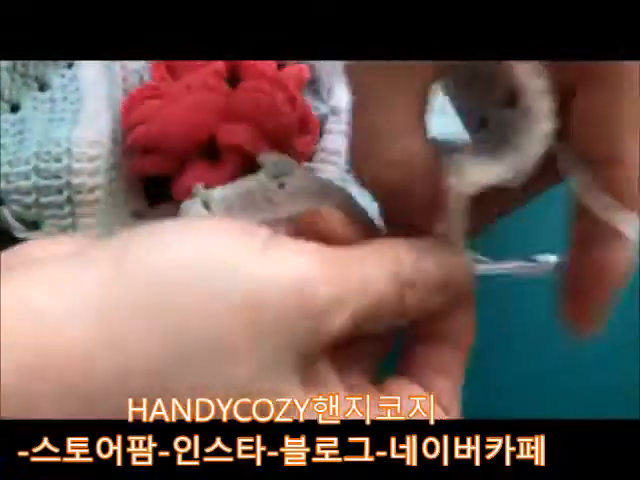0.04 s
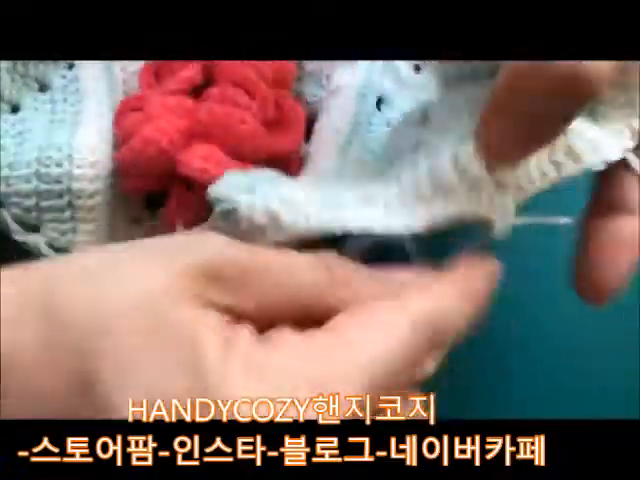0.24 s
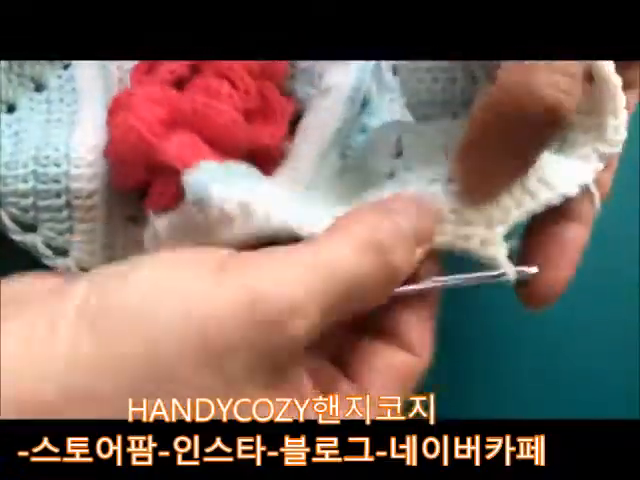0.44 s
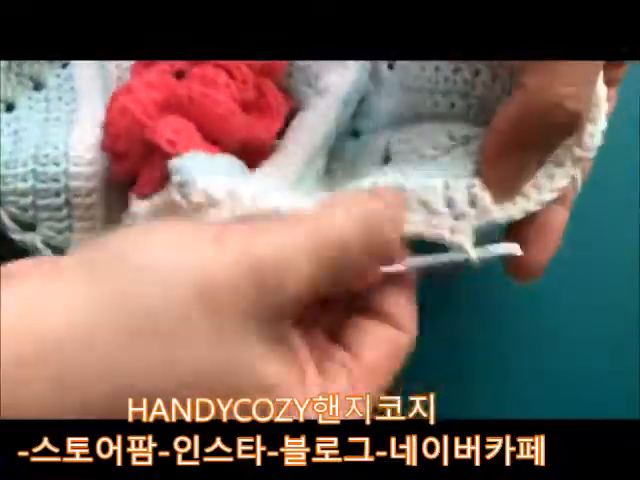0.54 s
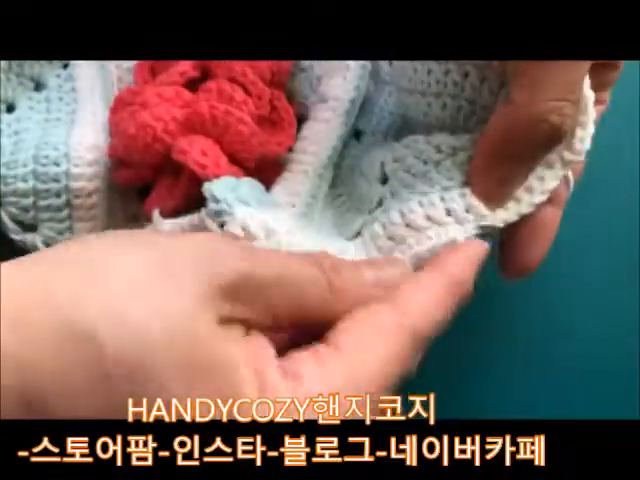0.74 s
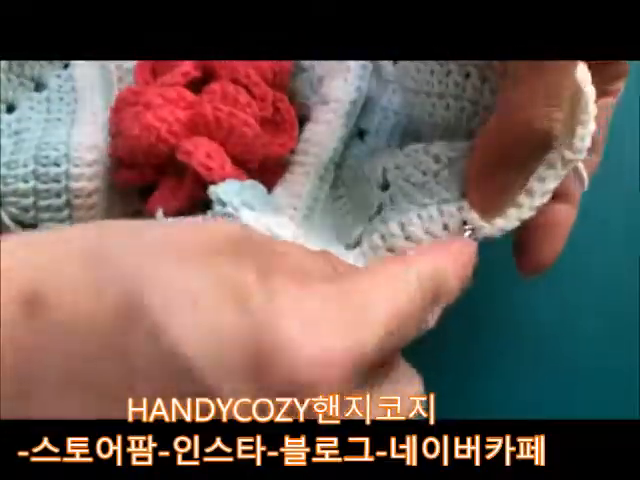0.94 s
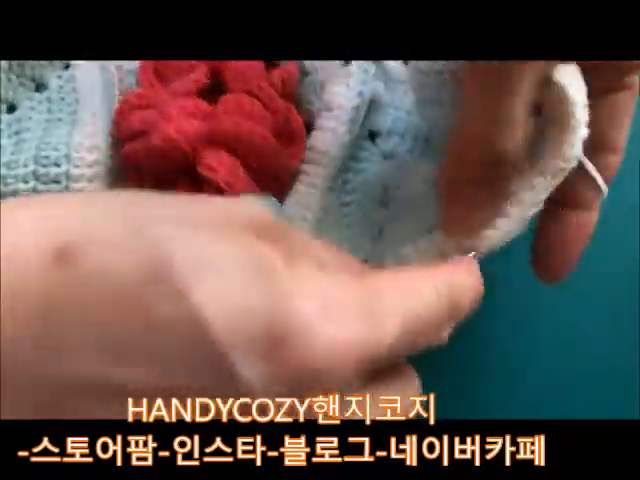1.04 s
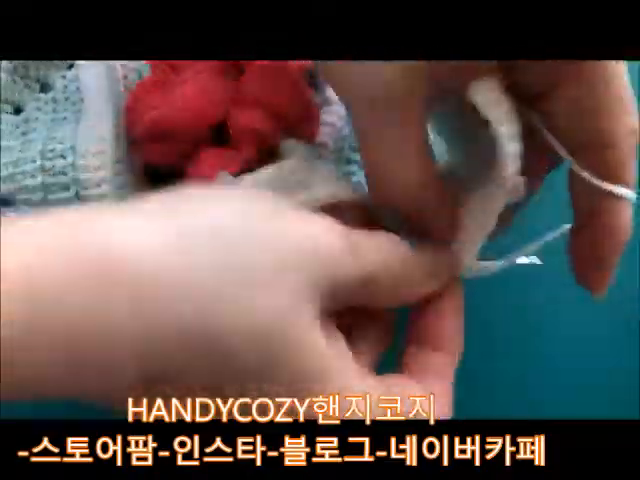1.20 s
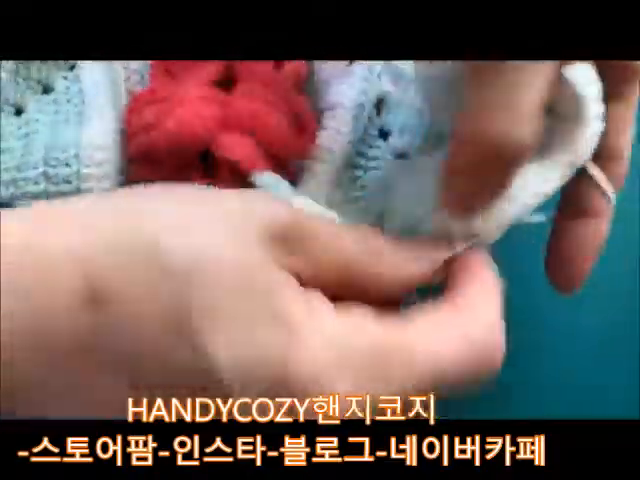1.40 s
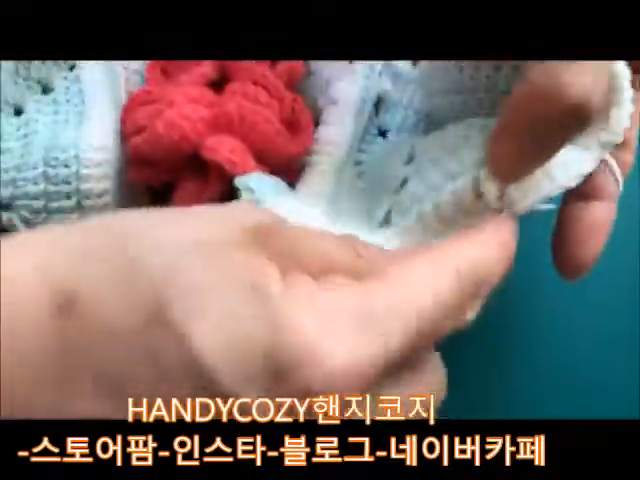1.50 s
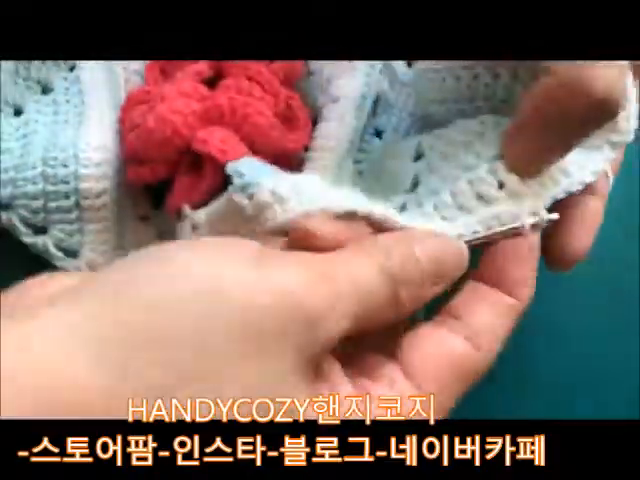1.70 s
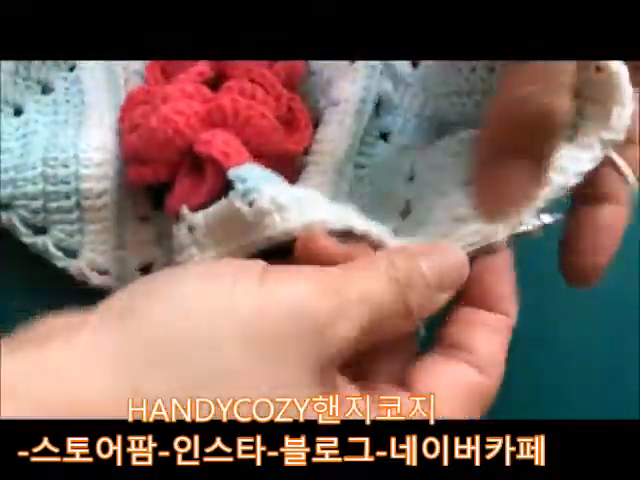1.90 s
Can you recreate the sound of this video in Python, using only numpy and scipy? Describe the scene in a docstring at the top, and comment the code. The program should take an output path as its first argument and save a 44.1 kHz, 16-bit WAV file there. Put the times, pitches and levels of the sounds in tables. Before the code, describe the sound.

Crocheted fabric rustles softly over fingers, with light hook ticks and dull table bumps.

```python
"""Yarn rustles over the fingers as hands turn a piece of crochet close to the microphone.
Countless fibres slip in each stroke, and the hook and snagging strands tick now and then.
The hands nudge the work table into its low, damped modes, once with a soft thump, and rumble
as they shift on it. The faint hum and hiss of a quiet room lie underneath."""
import sys
import numpy as np
from scipy import signal
from scipy.fft import rfft, irfft
from scipy.io import wavfile

SR = 44100
rng = np.random.default_rng(int(sys.argv[2]) if len(sys.argv) > 2 else 0)


def wrap_up_sound(samples):
    """Save the sound to the file named by the first command line argument, as 16-bit audio."""
    columns = np.atleast_2d(samples).T
    # keep every value between -1 and 1, then stretch to whole-number steps
    tamed = np.clip(columns, -1, 1)
    steps = np.round(tamed * 32767).astype(np.int16)
    wavfile.write(sys.argv[1], SR, steps)


N = 85995
TIME = np.arange(N) / SR
CUTOFF_HZ = 15850


def from_db(db):
    """Decibels to gain."""
    return 10 ** (np.asarray(db) / 20)


def rms_one(x):
    """Scale to an rms of 1."""
    return x / np.sqrt(np.mean(x ** 2) + 1e-20)


def fader(curve):
    """Gain over time from (time_s, level_db) points."""
    return from_db(np.interp(TIME, *np.transpose(curve)))


def coloured(white, spectrum):
    """EQ a white signal through (frequency_hz, level_db) points; the result has an rms of 1."""
    hz, db = np.transpose(spectrum)
    bin_hz = np.maximum(np.arange(N // 2 + 1) * SR / N, 1)
    low_cut = np.minimum(bin_hz / hz[0], 1) ** 2
    high_cut = bin_hz < CUTOFF_HZ
    eq = from_db(np.interp(np.log(bin_hz), np.log(hz), db))
    return rms_one(irfft(rfft(white) * low_cut * high_cut * eq, N))


def drift(rate_hz):
    """Smooth random wander with a spread of 1."""
    step = 40  # samples per control point
    points = N // step
    pole = np.exp(-2 * np.pi * rate_hz * step / SR)
    wander = signal.lfilter([1], [1, -2 * pole, pole * pole], rng.standard_normal(2 * points))[points:]
    return np.interp(np.arange(N) / step, np.arange(points), rms_one(wander))


def room_tone(waver_db=2.4, unrest_db=1.5, air_db=-60.5):
    """Faint, uneven air noise and a wavering hum."""
    # partials of the hum: pitch_hz, rms_db
    partials = [(59.5, -72), (119, -67.5), (211, -70)]
    # colour of the air noise: frequency_hz, level_db
    air_colour = [(25, -15.5), (60, -6), (130, -4), (180, -5.5), (235, -0.5), (290, -4.5), (380, -12),
                  (500, -8.5), (720, -16.5), (1150, -17), (1700, -19.5), (2600, -28.5), (6000, -41),
                  (10000, -51), (15500, -31)]
    hum = np.zeros(N)
    for hz, db in partials:
        amplitude = np.sqrt(2) * from_db(db - waver_db * drift(rate_hz=1))
        hum += amplitude * np.sin(2 * np.pi * (hz * TIME + rng.random()))
    air_gain = from_db(air_db + unrest_db * drift(rate_hz=10))
    return hum + air_gain * coloured(rng.standard_normal(N), air_colour)


def hand_rumble():
    """Dull rumble of the hands shifting on the table."""
    # rise and fall of the rumble: time_s, level_db
    shifting = [(0, -52), (0.04, -55.5), (0.09, -52), (0.23, -49), (0.28, -84), (0.42, -54.5), (0.60, -56),
                (0.74, -66), (0.80, -72), (1.0, -88), (1.58, -84), (1.68, -65), (1.81, -70), (1.88, -51),
                (1.95, -47)]
    # colour of the rumble: frequency_hz, level_db
    rumble_colour = [(22, -29), (38, 3), (65, -1.5), (120, -2), (190, -15), (300, -53), (600, -50)]
    return fader(shifting) * coloured(rng.standard_normal(N), rumble_colour)


def fibre_friction(slips_per_s=3600, spread_db=2, grain_db=-10.5):
    """Countless fibres slip past each other: white hiss with a fine grain."""
    sizes = from_db(spread_db * np.minimum(rng.exponential(1, N), 5))
    signs = rng.choice([-1, 1], N)
    slips = sizes * signs * (rng.random(N) < slips_per_s / SR)
    return rng.standard_normal(N) + from_db(grain_db) * rms_one(slips)


def yarn_rustle(flutter_db=1.53, patchy_db=1.5, bands=60):
    """Each stroke of yarn over fingers and hook swells and fades; its colour shifts as new fibres rub."""
    # strokes: peak_s, level_db, rise_s, fall_s, tilt_db_per_octave, rasp_db
    strokes = [(0.008, -66, .02, 0.015, -1.5, -3), (0.059, -65, 0.0065, 0.0095, -0.5, 0),
               (0.133, -65, 0.052, 0.023, 0.6, 0), (0.275, -65, 0.052, 0.074, 1.5, -2),
               (0.317, -61.5, 0.019, 0.024, 0.5, -2), (0.363, -59.5, 0.0041, 0.0033, 4.5, -8),
               (0.435, -66.5, 0.012, 0.02, 1.5, 3), (0.488, -70.5, 0.017, 0.023, -1.5, 2),
               (0.563, -63, 0.01, 0.019, 0, -5), (0.618, -62.5, 0.031, 0.071, 1.9, 0.5),
               (0.764, -67, 0.0073, 0.036, -0.5, -14), (0.91, -79.5, 0.0099, 0.047, -6, 3.5),
               (1.221, -66, 0.051, 0.067, 0.5, -0.5), (1.30, -66.5, 0.035, 0.048, -1.5, -2),
               (1.39, -69.5, 0.026, 0.03, 1.5, -14), (1.541, -67, 0.022, 0.023, 0, 4.5),
               (1.696, -63, 0.016, 0.017, -0.4, 1.5), (1.79, -73, 0.017, 0.035, -1.5, -4)]
    # light rubbing between strokes, as the fabric never rests: time_s, level_db
    light_rubbing = [(0, -74.5), (0.7, -77.5), (0.85, -78.5), (1.05, -77), (1.2, -72.5), (1.6, -72.5),
                     (1.95, -76)]
    # colour of the rustle: frequency_hz, level_db
    yarn_colour = [(300, -2.5), (900, 5), (1800, 0), (2700, 1.5), (4000, 3.5), (5500, 1), (7500, 0.5),
                   (9500, -2.5), (12000, -3.5), (15500, -3.5)]
    tilt_pivot_hz = 6640
    rasp_hz, rasp_octaves = 4400, 0.18  # a taut strand rasps in a narrow band
    stroke_power = []
    for peak_s, db, rise_s, fall_s, _, _ in strokes:
        width_s = np.where(TIME < peak_s, rise_s, fall_s)
        stroke_power.append(from_db(db) ** 2 * np.exp(-((TIME - peak_s) / width_s) ** 2))
    stroke_power = np.array(stroke_power)
    rubbing_power = fader(light_rubbing) ** 2
    tilts, rasps = np.transpose(strokes)[-2:]
    hiss_spectrum = rfft(coloured(fibre_friction(), yarn_colour))
    band_of_bin = np.arange(len(hiss_spectrum)) * SR / N * bands // CUTOFF_HZ
    rustle = np.zeros(N)
    for band in range(bands):
        hz = (band + .5) * CUTOFF_HZ / bands
        rasp_shape = np.exp(-(np.log2(hz / rasp_hz) / rasp_octaves) ** 2)
        colour_db = tilts * np.log2(hz / tilt_pivot_hz) + rasps * rasp_shape
        envelope = np.sqrt(rubbing_power + from_db(colour_db) ** 2 @ stroke_power)
        patchiness = from_db(patchy_db * drift(rate_hz=18))  # each band wanders on its own
        rustle += envelope * patchiness * irfft(hiss_spectrum * (band_of_bin == band), N)
    flutter = from_db(flutter_db * drift(rate_hz=40))
    return flutter * rustle


def table_bumps():
    """Soft blows swell and die in the table's damped modes, the low ones later; soft hands sound dull."""
    # a hand meets the table and its weight retunes it: start_s, level_db, lowpass_hz, pitch_ratio
    bumps = [(0.107, -41, 184, 0.93), (0.157, -44.5, 200, 1.12), (0.186, -38, 146, 0.97),
             (0.221, -34, 76, 0.78), (0.3551, -23.5, 420, 1.01), (0.3681, -29.5, 232, 0.92),
             (0.377, -41, 600, 1.097), (0.430, -38, 80, 0.84), (0.477, -46, 75, 0.81),
             (0.515, -38, 80, 0.8), (0.58, -43.5, 131, 0.9), (0.608, -47, 80, 0.82),
             (0.653, -43.5, 80, 0.86), (0.721, -51, 292, 0.965), (0.856, -51, 80, 0.674),
             (1.617, -42, 103, 0.8), (1.682, -45.5, 80, 0.78), (1.762, -43.5, 95, 0.91),
             (1.833, -39.5, 109, 1.73), (1.858, -44, 107, 1.3), (1.881, -42.5, 109, 1.0),
             (1.909, -37.5, 128, 1.02)]
    # modes of the work table before retuning: pitch_hz, level_db, swell_s
    modes = [(82.3, -2, 0.014), (170.1, -3.5, 0.0127), (245, -4, 0.0073), (404, -9, 0.0046),
             (572, -13.5, 0.0022)]
    out = np.zeros(N)
    for start_s, db, lowpass_hz, pitch_ratio in bumps:
        age = pitch_ratio * np.maximum(TIME - start_s, 0)  # a higher bump is also shorter
        for k, (hz, mode_db, swell_s) in enumerate(modes):
            polarity = (-1) ** (k + 1)
            gain = from_db(db + mode_db) / np.hypot(1, (hz / lowpass_hz) ** 3)
            swell = (age / swell_s * np.exp(1 - age / swell_s)) ** 2
            out += polarity * gain * swell * np.sin(2 * np.pi * hz * age)
    return out


def hook_ticks():
    """Each tick is one click in a broad resonance that the fabric damps at once."""
    # clicks of the hook and of snagging strands: start_s, level_db, centre_hz, width_hz
    ticks = [(0.3006, -45, 4500, 5000), (0.3088, -49, 9000, 7000), (0.3103, -28.5, 6240, 7040),
             (0.3175, -48, 4500, 3000), (0.3245, -56, 4500, 4000), (0.335, -43.5, 2060, 1500),
             (0.3612, -43.5, 1010, 490), (0.5493, -42.5, 3000, 4000), (0.5510, -41, 970, 600),
             (0.5570, -50, 2140, 900), (0.63, -34.5, 10000, 8000), (1.228, -43.5, 4160, 2500),
             (1.544, -49.5, 4400, 1500)]
    out = np.zeros(N)
    for start_s, db, centre_hz, width_hz in ticks:
        click = np.full(N, 1e-18)
        click[int(start_s * SR)] = from_db(db)
        radius = np.exp(-np.pi * width_hz / SR)
        resonance = [1, -2 * radius * np.cos(2 * np.pi * centre_hz / SR), radius * radius]
        out += signal.lfilter([.5, 0, -.5], resonance, click)
    return out


def scene():
    """Everything at one close microphone, in mono."""
    return (yarn_rustle() + hook_ticks() + table_bumps() + hand_rumble() + room_tone())[None]


def record(dry):
    """A steep low-pass takes off the very top."""
    return signal.sosfilt(signal.ellip(12, .1, 70, CUTOFF_HZ, fs=SR, output="sos"), dry)


dry = scene()
out = record(dry)
wrap_up_sound(out)
```